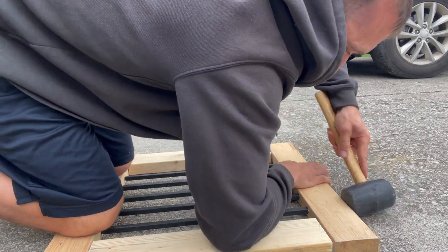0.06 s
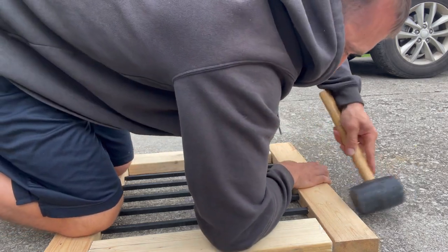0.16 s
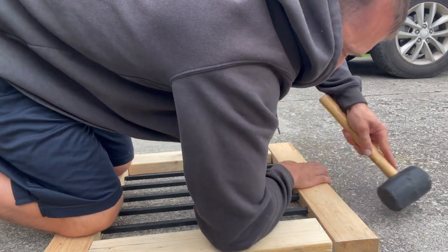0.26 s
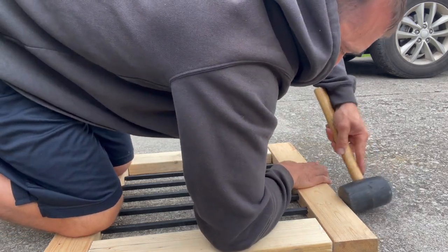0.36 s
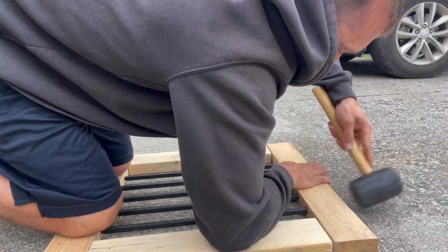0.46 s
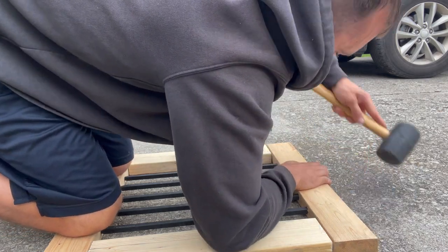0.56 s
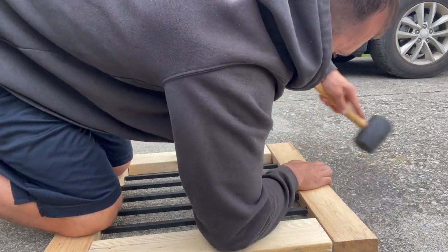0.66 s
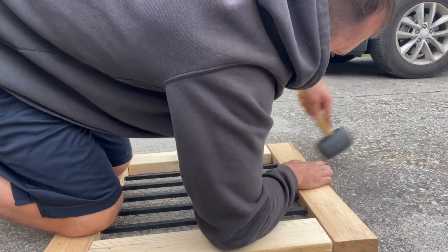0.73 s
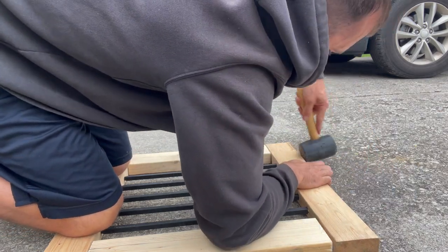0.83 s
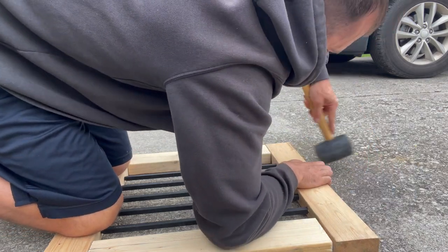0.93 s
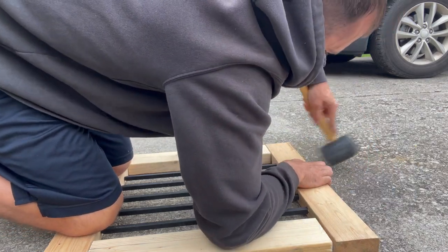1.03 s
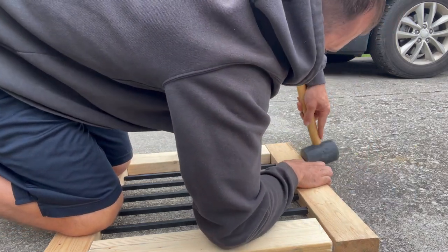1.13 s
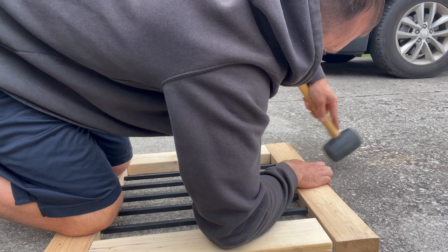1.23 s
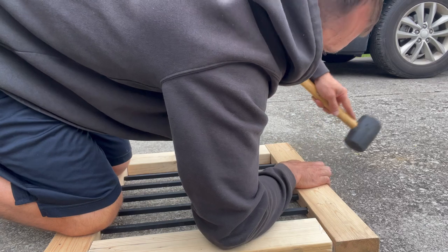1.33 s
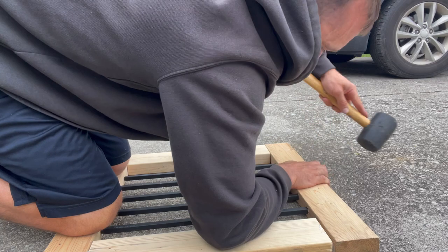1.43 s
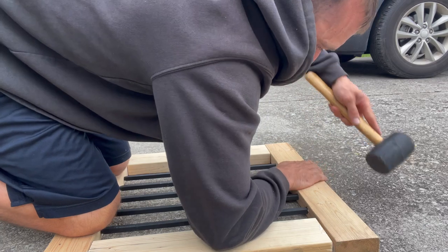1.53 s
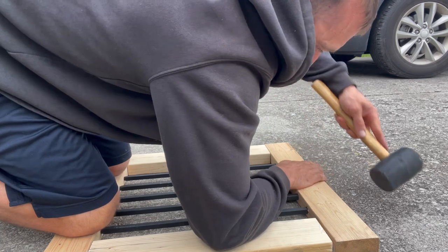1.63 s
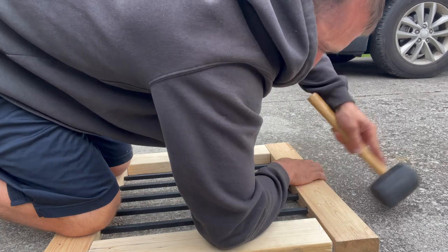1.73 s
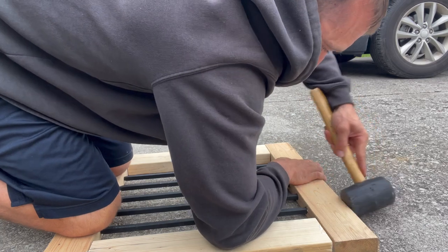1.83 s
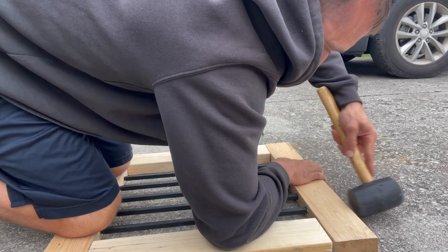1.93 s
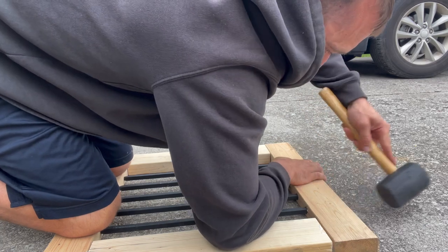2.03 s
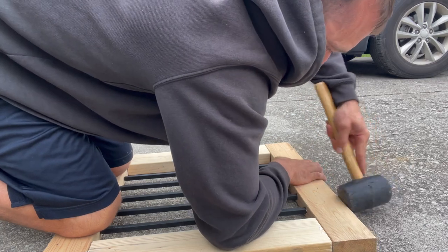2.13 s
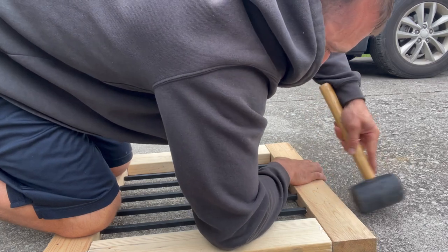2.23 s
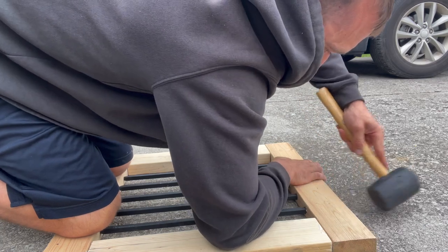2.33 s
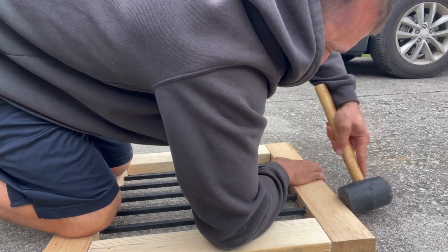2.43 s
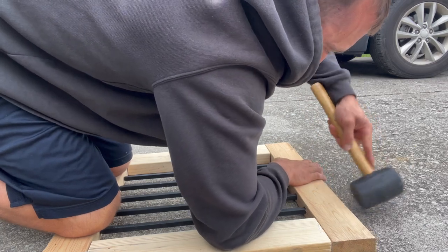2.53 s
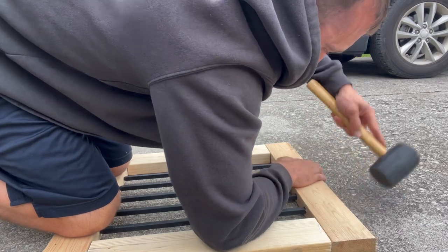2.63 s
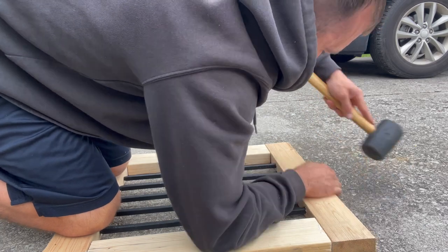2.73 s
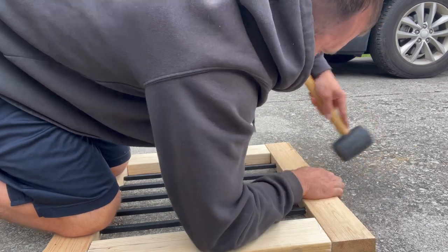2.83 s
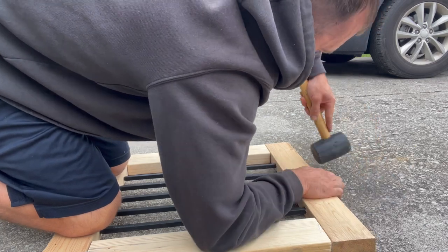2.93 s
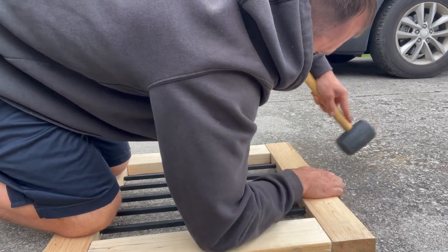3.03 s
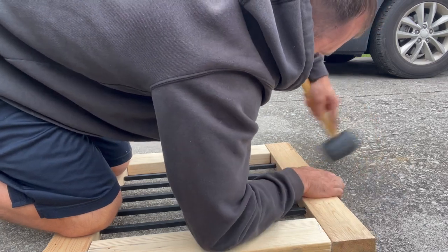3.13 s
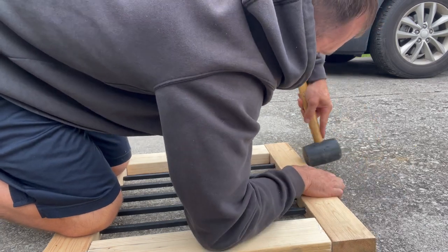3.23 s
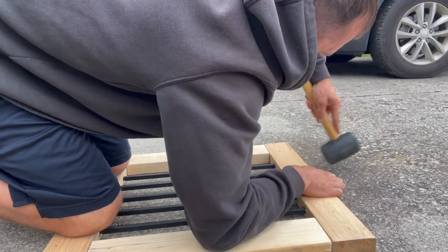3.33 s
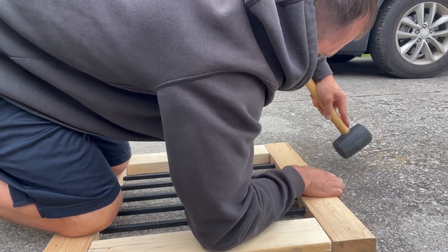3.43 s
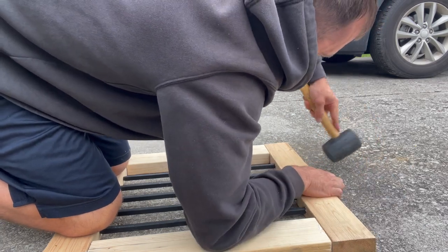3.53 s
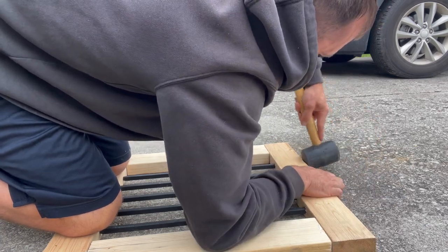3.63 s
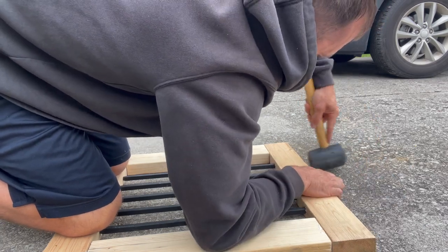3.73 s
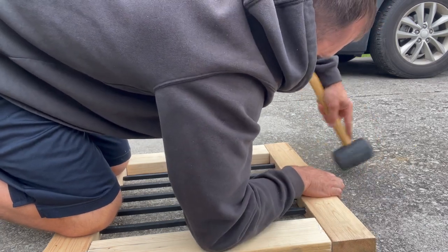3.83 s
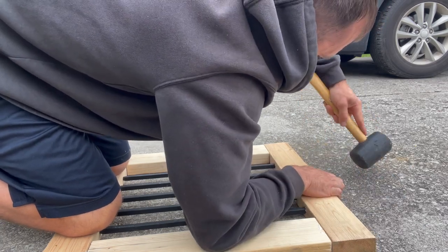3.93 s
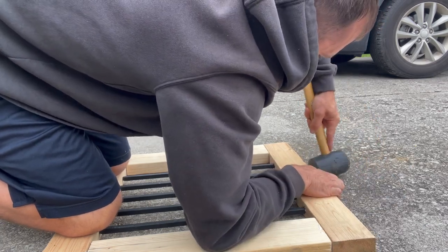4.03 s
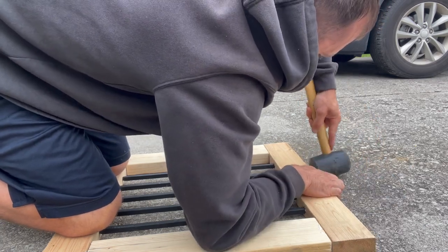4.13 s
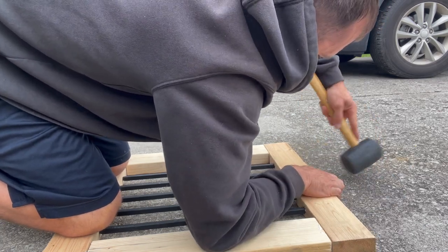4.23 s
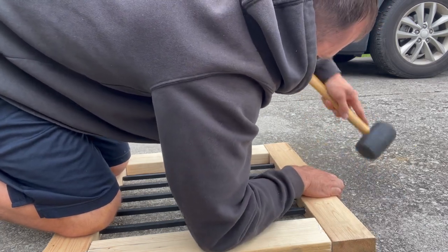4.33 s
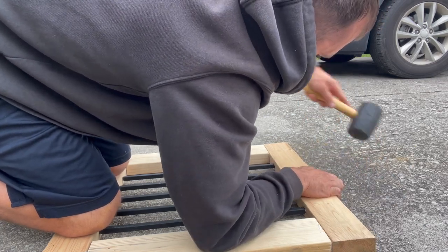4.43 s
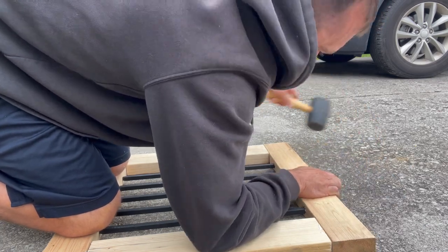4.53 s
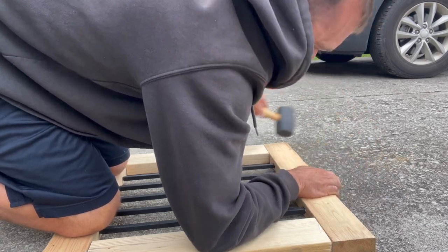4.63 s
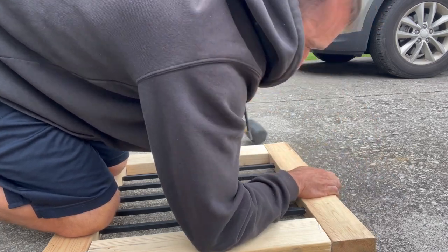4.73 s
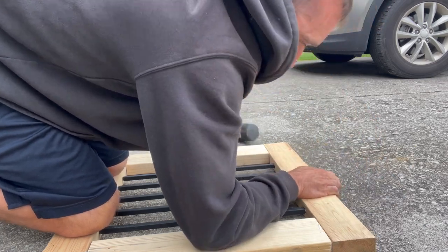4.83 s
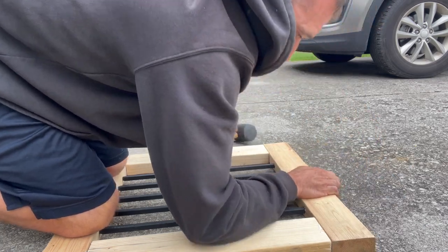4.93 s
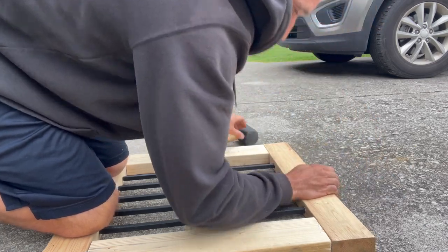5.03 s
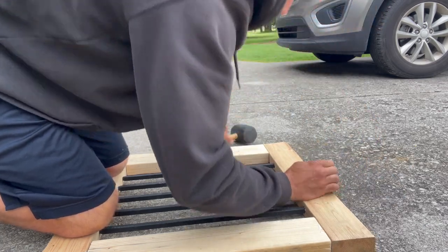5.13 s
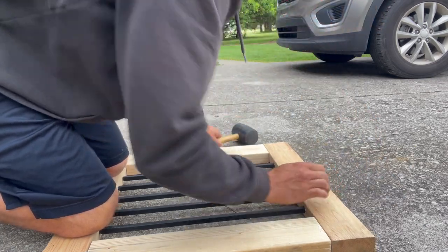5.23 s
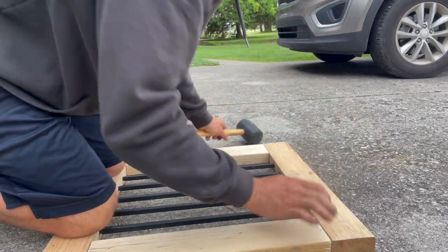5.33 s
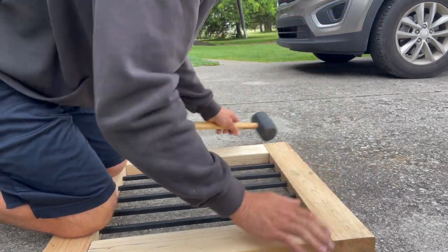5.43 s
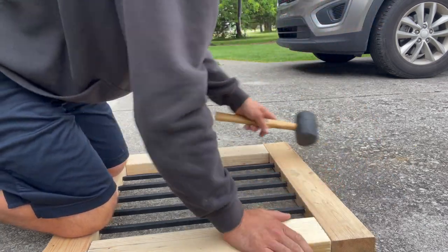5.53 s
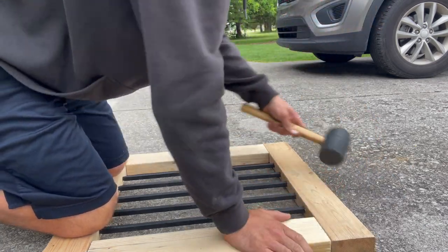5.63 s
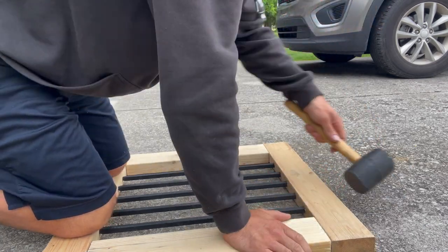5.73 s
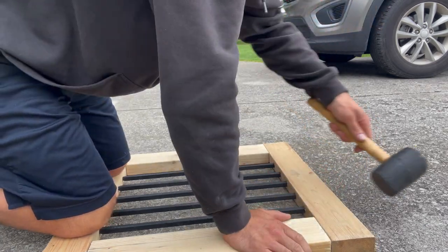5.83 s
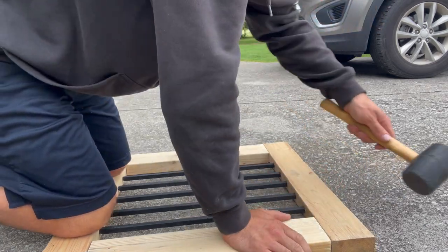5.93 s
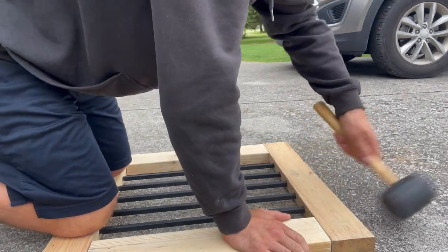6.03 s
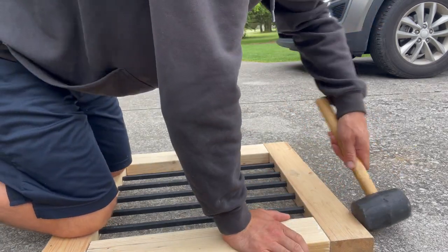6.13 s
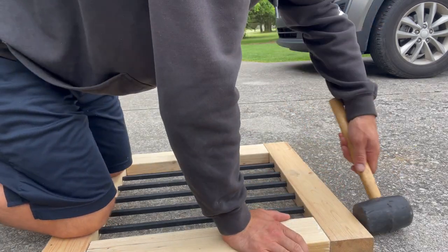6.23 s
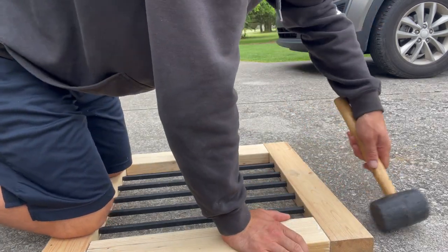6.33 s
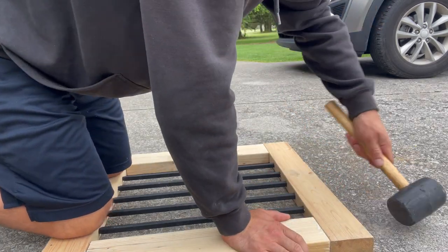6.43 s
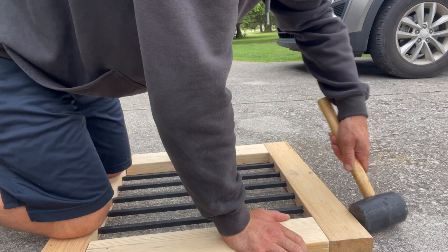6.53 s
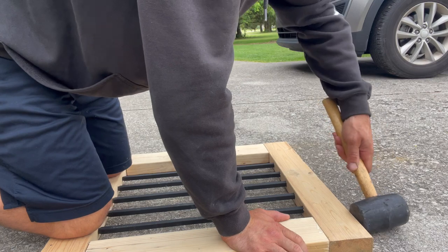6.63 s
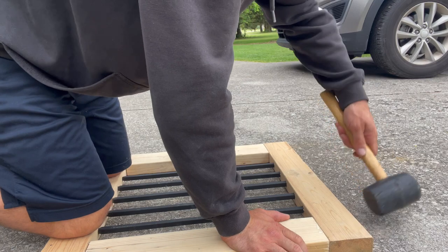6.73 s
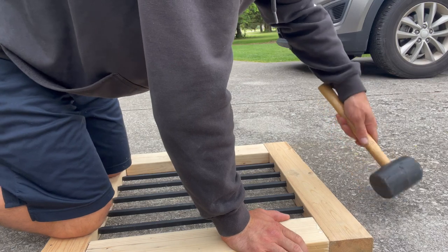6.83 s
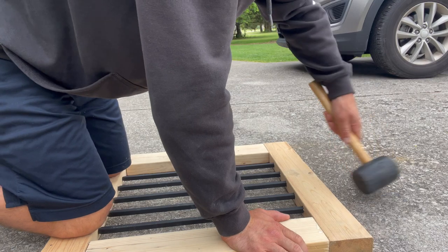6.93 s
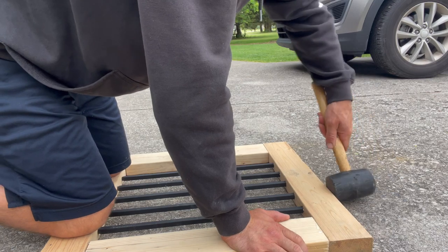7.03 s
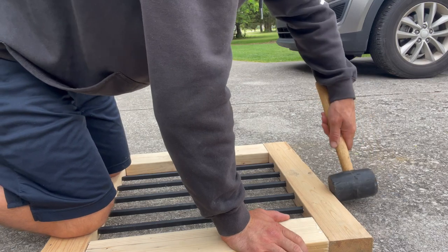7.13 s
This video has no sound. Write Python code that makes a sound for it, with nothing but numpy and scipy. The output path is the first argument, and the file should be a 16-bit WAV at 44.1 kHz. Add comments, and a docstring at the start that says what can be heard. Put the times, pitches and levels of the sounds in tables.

```python
"""Close by on a paved drive, a rubber mallet knocks a wooden frame with metal bars together.
A light bump leads into the first run of blows, with one very light tap among them; each bends the boards,
cracks the joint, sets the bars ringing faintly and scatters round the yard. After four seconds come a
cluster of bumps and soft hisses of a hand sliding and a sleeve rustling; from six seconds three last blows.
Throughout, birds sing far off, chirps and whistles blurred by trees, over a low rumble made of noise."""
import sys
import numpy as np
from scipy import signal
from scipy.fft import rfft, irfft
from scipy.io import wavfile
from scipy.ndimage import map_coordinates

SR = 44100
rng = np.random.default_rng(int(sys.argv[2]) if len(sys.argv) > 2 else 0)


def generate_wav(signal):
    """Clip the signal to [-1, 1] and save it as 16-bit WAV at the path in sys.argv[1]."""
    frames = np.transpose(np.atleast_2d(signal))
    scaled = np.clip(frames, -1, 1) * 32767
    pcm = np.round(scaled).astype(np.int16)
    wavfile.write(sys.argv[1], SR, pcm)


N = 316638
SIZE = 32768  # samples in one knock
HZ, AGE = np.fft.rfftfreq(SIZE, 1 / SR), np.arange(SIZE) / SR

# Centres of a knock's four bands, thump, body, bite and crack. Each entry: frequency in Hz.
KNOCK_HZ = [200, 700, 2000, 8000]


def knocks(spot_width=.17, spot_in_tail=.35):
    """Force and place shape each knock; it favours the modes that are free to move at the struck spot."""
    # Mallet blows, and one very light tap at 2.693 by hand or mallet.
    # Each row: start in seconds, force in dB, place along the board (0 near - 1 far),
    # crack of the joint in dB, bars in dB, lift in dB of the pitches that the struck spot favours,
    # main pitch in Hz, second pitch in Hz.
    blows = [ (0.073, -1.5, 0.055, -2.5, 0.5, 11.5, 630, 346), (0.3431, 0, 0.24, -1.5, 0, 9.5, 1120, 341),
             (.783, -.5, 0.52, -7.5, -2.5, 11.5, 427, 860), (1.07, -2, 0.78, -7.5, -2, 13, 498, 1570),
             (1.804, -.5, 0.24, 3, 8, 8, 770, 1400), (2.098, 0.5, 0.21, 2, 5.5, 8, 357, 1380),
             (2.379, 1.5, 0.4, -3.5, -3, 10, 940, 557), (2.693, -33.5, 1, -51, -40, 22.5, 718, 1600),
             (3.152, 0, 1, -6, -1, 8, 536, 2190), (3.625, -9.5, .3, -18, -30, 11, 751, 225),
             (4.014, 0, 0.26, 2, -2, 8, 720, 510.5), (6.069, 3, 0.26, 1.5, 5, 4.5, 1383, 267),
             (6.482, 3, 0.062, -2.5, 0.5, 3, 455, 332), (6.960, 1.5, 0.082, -7, -1, 8.5, 730, 1600)]
    # The farther off the blow lands, the thinner, more smeared and more scattered it arrives,
    # and the more from the left. Each pair: at the near end, at the far end.
    thump_ends_db, body_ends_db, bite_ends_db = (5, -4.5), (-1, -2.5), (-4.5, 2)
    smear_ends_s, scatter_ends_db = (.0014, .0028), (0.5, 6)
    linger_ends = (1.12, 1.434)  # factor on the yard's decay time
    pan_ends_db = (-4, 3)  # left minus right
    # rubber stiffens under load, so a harder blow is brighter: dB per dB of force
    thump_growth, bite_growth = 0.96, 1.4
    second_share = 0.65  # of the lift, for the spot's second pitch
    out = np.zeros((2, N))
    for s, force_db, place, crack_db, bars_db, lift_db, main_hz, second_hz in blows:
        thump_db = along(thump_ends_db, place) + thump_growth * force_db
        middle_db = along(body_ends_db, place) + force_db
        bite_db = along(bite_ends_db, place) + bite_growth * force_db
        body_db = frame_db([thump_db, middle_db, bite_db, crack_db])
        main, second = (np.exp(-(np.log((HZ + 1) / hz) / spot_width) ** 2) for hz in (main_hz, second_hz))
        spot_db = lift_db * (main + second_share * second)
        direct = bend(body_db + spot_db, along(smear_ends_s, place), along(pan_ends_db, place))
        add(out, s - SIZE / 2 / SR, direct)
        scatter_db = body_db + spot_in_tail * spot_db + along(scatter_ends_db, place)
        scatter = yard(scatter_db, along(linger_ends, place))
        add(out, s, scatter + amp(bars_db) * bars())
    return out


def frame_db(strength_db):
    """Spectrum of the frame's answer to a knock: broad boards, resonant modes and the knock's four bands."""
    # The boards' broad response. Each row: frequency in Hz, level in dB.
    wood = [(25, -20), (55, 9), (90, 15.5), (170, 21.5), (400, 22), (800, 17), (1500, 17), (2800, 7),
            (7000, 7), (10500, 5), (15000, -5.5)]
    # Modes of the frame. Each row: centre in Hz, width in Hz, lift in dB.
    mode_rows = [(244, 20, 3), (318, 23, 3.5), (433, 20, 2.5), (617, 310, 6.5), (693, 360, 3.5),
                 (997, 75, 5), (1180, 27, 0.5), (1516, 26, 1), (1743, 430, 4), (2216, 66, 4.5),
                 (2680, 38, 3.5), (3250, 200, 2.5), (3920, 700, 4.5), (4383, 110, 0.5), (5300, 1900, 4),
                 (5570, 200, 0), (11300, 600, 5)]
    modes = sum(db / (1 + (2 * (HZ - hz) / width) ** 2) for hz, width, db in mode_rows)
    return read(wood, HZ) + modes + read(list(zip(KNOCK_HZ, strength_db)), HZ)


def bend(db, smear, pan_db, travel=.0025, dispersion=.33, ripple_db=1.5, stray=0.91, turn=0.95, lean_db=0.5):
    """Bending waves run along the boards by many paths, treble first and bass last."""
    # Phase between the microphone ports. Each row: frequency in Hz, base phase by which left leads in radians.
    ports = [(30, 0), (150, -1.5), (350, 0.81), (650, -1.5), (1200, 2.12), (2200, -2.5), (2900, 1.5),
             (3700, 2.3), (5500, 2.5), (7500, 3.5), (9500, 5), (13000, 6.5)]
    delay = travel * (1000 / (HZ + 150)) ** dispersion  # seconds
    delay = delay + smear * wander(HZ, 230) / (1 + HZ / 12000)
    phase = -2 * np.pi * np.cumsum(delay) * HZ[1]
    low = 1 / (1 + (HZ / 600) ** 2)
    # the crowded upper modes answer unevenly, differently at each spot
    uneven_db = ripple_db * (1 - low) * wander(HZ, 130)
    wave = causal(db + uneven_db) * np.exp(1j * phase)
    # the struck spot leans the sound to one side, in level and in phase
    ports_differ = HZ / (HZ + 120) / (1 + (HZ / 8000) ** 2)
    lead = read(ports, HZ) + ports_differ * (turn * pan_db * low + stray * wander(HZ, 380))
    side_db = pan_db + lean_db * (1 - low) * ports_differ * wander(HZ, 450)
    lean = amp(side_db / 2) * np.exp(.5j * lead)
    # centred in the buffer, so that callers start it half a buffer early
    return np.roll(irfft([wave * lean, wave / lean]), SIZE // 2, axis=1)


def yard(db, linger, rattle=4.1, rattle_s=0.013, echo=0.45, echo_s=.055, echo_width=0.0094,
         rise_s=.005, mono_hz=170, lumps_db=2, wood_hz=1000, ripple_db=3.5):
    """The frame shudders on; ground, car and trees scatter the knock, and a wall returns it."""
    # Colour of what the yard scatters back. Each row: frequency in Hz, level in dB.
    yard_colour = [(60, -2.5), (120, -0.5), (300, -6.5), (700, -6), (1100, -2.5), (1600, -8.5),
                   (2500, -2.5), (4000, -12), (6500, -14), (7700, -23), (10000, -11), (15000, -23.5)]
    # Its decay before the linger factor. Each row: frequency in Hz, time to fall 60 dB in seconds.
    yard_t60 = [(100, 0.48), (300, 0.34), (900, 0.32), (2500, 0.35), (6000, 0.37), (14000, 0.27)]
    hz, t, z = signal.stft(rng.standard_normal((3, SIZE)), SR, nperseg=256)
    shared = (1 / (1 + (hz / mono_hz) ** 2))[:, None]  # the bass reaches both ports alike
    z = np.sqrt(1 - shared) * z[:2] + np.sqrt(shared) * z[2]
    decay = amp(-60 * t / (linger * read(yard_t60, hz)[:, None]))
    tail = signal.istft(z * decay, SR, nperseg=256)[1][:, :SIZE]
    shudder = rattle * np.exp(-AGE / rattle_s)
    wall = echo * np.exp(-((AGE - echo_s) / echo_width) ** 2)
    tail = tail * (1 + shudder + wall)
    tail = tail * (1 - np.exp(-(AGE / rise_s) ** 2)) * amp(lumps_db * wander(AGE, 0.0045))
    woody = np.exp(-np.log((HZ + 1) / wood_hz) ** 2)  # the boards' crowded middle modes ring on unevenly
    colour = causal(db + read(yard_colour, HZ) + ripple_db * woody * wander(HZ, 70))
    return irfft(rfft(evened(tail)) * colour) / np.sqrt(SIZE)


def bars(uneven_db=3, detune=.003, count=3):
    """Several nearly equal metal bars sing on in a beating cluster of high modes."""
    # Ring of one bar before its random spread and the blow's own gain.
    # Each row: frequency in Hz, level in dB, time to fall 60 dB in seconds.
    bar_modes = [(8960, -67, .45), (9130, -61, .35), (9290, -55, .52), (9450, -59, .4), (9650, -59, .4),
                 (9780, -61, .35)]
    hz, db, t60 = np.transpose(list(bar_modes) * count)[:, :, None]
    level, shift = rng.standard_normal((2, len(hz), 1))
    turns = hz * (1 + detune * shift) * AGE + rng.random((len(hz), 1))
    decay = np.exp(-np.log(1000) * AGE / t60)
    rings = amp(db + uneven_db * level) * decay * np.sin(2 * np.pi * turns)
    return rings.sum(0) / np.sqrt(count)


def bumps(rock_hz=245, rock_width=130, rock_db=11, weight_db=-6, smear=.0009, yard_db=-4, linger=1.6):
    """Light bumps, each a thud and a click; every one rocks the frame in its lowest mode."""
    # Small bumps of the frame on the paving. Each row: start in seconds, dull thud in dB, click in dB,
    # centre of the click in Hz.
    bump_rows = [ (0.031, -9.5, -16, 6760), (0.317, -4.5, -13.5, 7840), (1.778, 2, -13, 6900),
                 (3.645, -12, -13, 2470), (4.719, -6.5, -65, 1000), (4.807, -7.5, -55, 1008),
                 (4.859, -40, -22, 8000), (4.878, -38, -14.5, 4000), (4.898, -17.5, 2.5, 1950),
                 (4.921, -19, -20, 5970), (4.966, -12.5, -14.5, 1400), (5.08, -14, -58, 1000),
                 (5.097, -13, -60, 1000), (5.175, -35, -25.5, 1600), (5.194, -33, -24.5, 1400),
                 (5.474, -42, -26, 3030), (5.822, -43, -29, 2810), (5.852, -49, -31, 2486)]
    # dB per octave: a thud falls above the thump, a click either side of its centre
    thud_slope_db, click_slope_db = 17, 7
    out = np.zeros((2, N))
    rocking_db = weight_db + rock_db / (1 + (2 * (HZ - rock_hz) / rock_width) ** 2)
    rocking_db = rocking_db - 20 * np.log10(1 + (150 / (HZ + 1)) ** 2)  # thins the deep bass
    bands = np.array(KNOCK_HZ)
    for s, thud_db, click_db, click_hz in bump_rows:
        thud = thud_db - thud_slope_db * np.log2(bands / bands[0])
        click = click_db - click_slope_db * abs(np.log2(bands / click_hz))
        body_db = frame_db(np.maximum(thud, click)) + rocking_db
        add(out, s - SIZE / 2 / SR, bend(body_db, smear, 0, travel=0.0012, dispersion=0.099))
        add(out, s, yard(body_db + yard_db, linger))
    return out


def hand_and_sleeve(grain_db=4.0):
    """Rubbing makes soft grainy hisses: noise that swells and fades with each slide or rustle."""
    # Soft hisses of a hand sliding over the wood and of a sleeve rustling.
    # Each row: middle in seconds, half length in seconds, level in dB.
    hisses = [(2.719, 0.078, -56.5), (4.921, 0.075, -57), (5.14, 0.051, -65.5), (5.336, 0.024, -73),
              (5.502, 0.038, -63), (5.58, 0.14, -73.5)]
    # Colour of the hiss. Each row: frequency in Hz, relative level in dB per Hz.
    hiss_colour = [(1760, -9.5), (3000, -6.5), (3710, -6), (4120, -3.5), (4990, -10.5), (7480, -18),
                   (10300, -8), (14600, -21), (15500, -47)]
    t = np.arange(N) / SR
    swell = sum(amp(db) * np.exp(-((t - s) / half) ** 2) for s, half, db in hisses)
    return swell * amp(grain_db * wander(t, 0.027)) * noise(hiss_colour)


def birds(flutter_db=3, wet=4.3, count=150):
    """Falling chirps and level whistles over a chorus of farther ones, all blurred by the trees."""
    # The nearer bird notes. Each row: start in seconds, length in seconds, first pitch in Hz,
    # level in dB before flutter and blur.
    notes = [ (0.171, 0.31, 2610, -69.5), (.56, 0.054, 3180, -65), (1.306, 0.15, 2294, -74.5),
             (1.579, 0.052, 2155, -75.5), (2.26, 0.23, 2242, -67), (2.752, 0.08, 3205, -67),
             (2.895, 0.051, 2950, -73), (3.029, .067, 2734, -73.5), (4.725, .08, 4940, -72),
             (5.106, 0.16, 4200, -77), (5.771, 0.11, 3607, -78)]
    # the far chorus: ranges of length in seconds, pitch in Hz and level in dB
    chorus_s, chorus_hz, chorus_db = (.05, .16), (2300, 4250), (-90, -80)
    # the shortest notes drop by nearly this share of their pitch; those well over chirp_s hold it
    chirp_fall, chirp_s = 0.25, 0.13
    warble, trees_t60 = .022, .28  # share of the pitch; seconds to fall 60 dB
    lowest, highest = np.transpose([(0, N / SR), chorus_s, chorus_hz, chorus_db])
    chorus = lowest + (highest - lowest) * rng.random((count, 4))
    song = np.zeros((1, N))
    for s, length, first_hz, db in [*notes, *chorus]:
        t = np.arange(0, length, 1 / SR)
        last_hz = first_hz * (1 - chirp_fall * np.exp(-(length / chirp_s) ** 2))
        hz = np.geomspace(first_hz, last_hz, len(t)) * (1 + warble * wander(t, 0.0022))
        loudness = amp(db + flutter_db * wander(t, 0.0044)) * signal.windows.tukey(len(t), .5)
        note = loudness * np.sin(2 * np.pi * np.cumsum(hz) / SR)
        add(song, s, note[None])
    trees = evened(rng.standard_normal((2, SIZE)) * amp(-60 * AGE / trees_t60)) / np.sqrt(SIZE)
    return song + wet * signal.fftconvolve(song, trees, axes=1)[:, :N]


def air(level_db=-51):
    """Low, even outdoor rumble with a trace of hiss, made of shaped noise."""
    # The outdoor background. Each row: frequency in Hz, relative level in dB per Hz.
    air_colour = [(15, -55), (25, -30), (43, -7), (70, -1), (100, -2), (153, -11.5), (242, -14),
                  (400, -22.5), (640, -32), (1040, -43), (1700, -52), (3000, -49), (5000, -55),
                  (11000, -58), (16000, -74)]
    return amp(level_db) * noise(air_colour)


def noise(spectrum):
    """Stereo noise of a given spectrum at rms 1, partly alike in both microphone ports."""
    # How alike noise is in the two ports. Each row: frequency in Hz, likeness from 0 to 1.
    likeness = [(40, .9), (80, .8), (180, .5), (550, .1), (5000, .2), (15000, .7)]
    hz = np.fft.rfftfreq(N, 1 / SR)
    a, b = rfft(rng.standard_normal((2, N)))
    same = np.clip(read(likeness, hz), -1, 1)
    pair = np.array([a, same * a + np.sqrt(1 - same ** 2) * b])
    return evened(irfft(pair * amp(read(spectrum, hz)), N))


def causal(db):
    """The spectrum of a body with this colour, which rings only after it is struck (minimum phase)."""
    log_gain = np.log(amp(np.maximum(db, -100)))
    circle = np.concatenate([log_gain, log_gain[-2:0:-1]])
    return np.exp(np.conj(signal.hilbert(circle)))[:len(db)]


def along(ends, place):
    """The value at a place between the near end (0) and the far end (1) of the board."""
    return ends[0] + (ends[1] - ends[0]) * place


def wander(axis, step):
    """A smooth random curve of rms about 1 through a new random value every step along the axis."""
    return map_coordinates(rng.standard_normal(2048), [axis / step], order=3, mode="wrap")


def read(points, hz):
    """Joins (Hz, value) points on a log-frequency axis."""
    f, value = np.transpose(points)
    return np.interp(np.log(hz + 1), np.log(f + 1), value)


def amp(db):
    """Decibels to gain."""
    return np.exp(np.asarray(db) * np.log(10) / 20)


def evened(x):
    """Scales to rms 1."""
    return x / np.sqrt(np.mean(x ** 2) + 1e-20)


def add(mix, s, sound):
    """Mixes a sound in from time s, cutting what falls outside the mix."""
    start = round(s * SR)
    sound = sound[:, max(-start, 0):]
    part = mix[:, max(start, 0):][:, :sound.shape[1]]
    part += sound[:, :part.shape[1]]


def scene():
    """The work on the frame and the outdoors around it."""
    return knocks() + bumps() + hand_and_sleeve() + birds() + air()


def record(dry, ceiling=0.64, edge_hz=15900):
    """The loudest peaks are rounded off below the ceiling; then a low-pass limits the band."""
    held = dry / (1 + (dry / ceiling) ** 6) ** (1 / 6)
    low_pass = signal.firwin(161, edge_hz, window=("kaiser", 9), fs=SR)
    return signal.oaconvolve(held, low_pass[None], "same", axes=1)


dry = scene()
out = record(dry)
generate_wav(out)
```